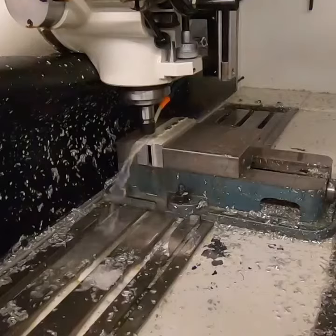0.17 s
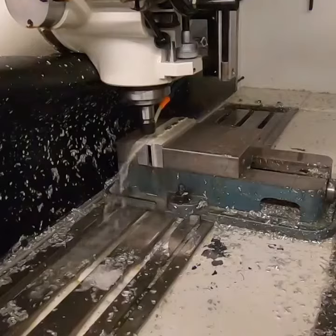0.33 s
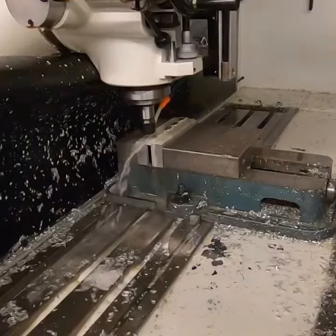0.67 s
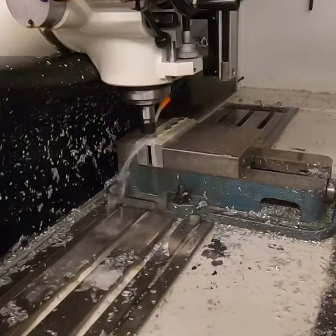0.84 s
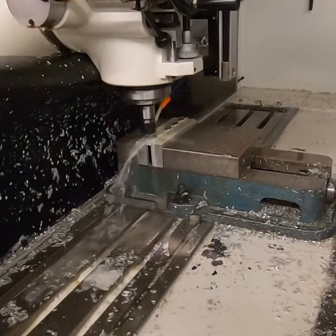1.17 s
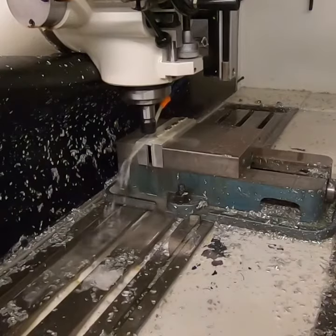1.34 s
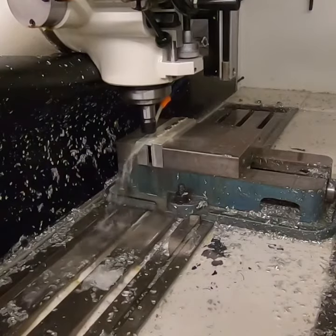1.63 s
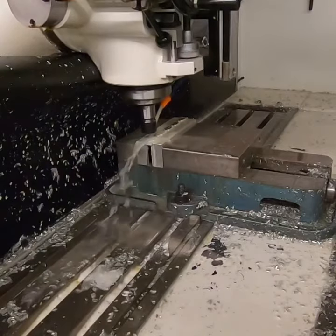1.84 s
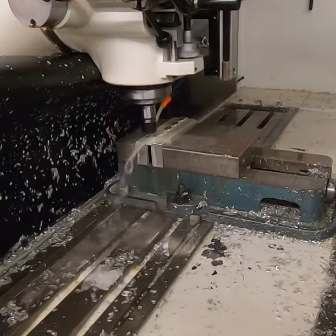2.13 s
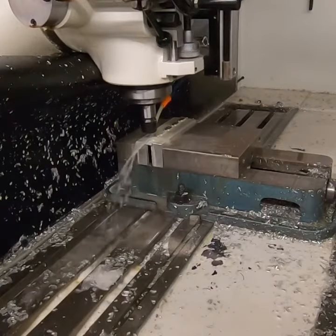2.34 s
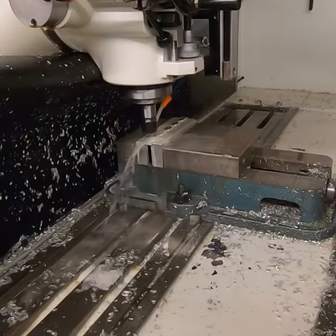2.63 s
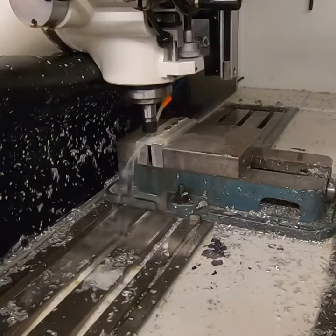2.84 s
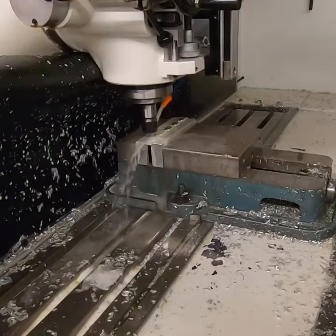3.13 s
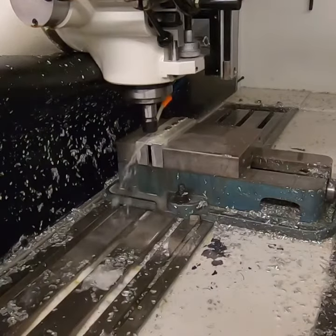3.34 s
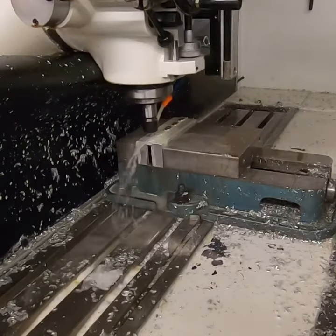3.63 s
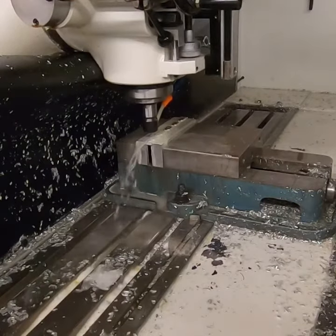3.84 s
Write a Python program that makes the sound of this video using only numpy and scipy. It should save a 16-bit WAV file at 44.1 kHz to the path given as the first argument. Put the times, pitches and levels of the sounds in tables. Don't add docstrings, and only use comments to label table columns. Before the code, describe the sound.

Continuous low drone of a milling machine in a workshop: uneven cabinet rumble and soft low thumps, singing spindle tones, a pump hum that swells and sags, and very faint hiss, all muffled, without a finish.

```python
import sys
import numpy as np
from scipy import signal
from scipy.fft import rfft, irfft
from scipy.io import wavfile
from scipy.ndimage import uniform_filter1d

SR = 44100
rng = np.random.default_rng(int(sys.argv[2]) if len(sys.argv) > 2 else 0)


def makeup_ratio(level_db):
    decades = np.asarray(level_db, float) / 20
    return 10 ** decades


def waveform_to_disk(signal):
    frames = np.transpose(np.atleast_2d(signal))
    scaled = np.clip(frames, -1, 1) * 32767
    samples = np.round(scaled).astype(np.int16)
    wavfile.write(sys.argv[1], SR, samples)


N = 176400

# (time [s], peak [dB], pitch [Hz])
CABINET_THUMPS = [(0.332, -22, 190), (0.379, -20, 197), (0.422, -21.5, 193), (0.502, -21, 196),
                  (0.53, -19.5, 203), (0.58, -24.5, 208), (0.623, -20.5, 186), (0.694, -24, 212),
                  (0.716, -25.5, 169.5), (0.837, -27, 202), (0.877, -23, 198), (0.929, -27, 179),
                  (1.003, -26.1, 194), (1.033, -31, 202), (1.082, -21, 201), (1.138, -23, 218),
                  (1.262, -33, 211), (1.324, -23.5, 212), (1.37, -25.5, 214), (1.403, -28, 225),
                  (1.453, -22, 214), (1.499, -24.5, 195), (1.531, -24, 184), (1.628, -28.5, 193),
                  (1.678, -28.5, 200), (1.771, -32.5, 206), (1.824, -23.5, 221), (1.852, -26.5, 193),
                  (2.01, -22.5, 216), (2.09, -23.5, 196), (2.15, -25.5, 198), (2.286, -24, 190),
                  (2.328, -27.8, 210), (2.357, -27, 205), (2.47, -28.5, 216), (2.553, -27, 204),
                  (2.598, -25.5, 209), (2.808, -22.5, 207), (2.839, -26, 223), (3.109, -28, 194),
                  (3.142, -25.5, 199), (3.228, -25, 182), (3.285, -23, 203.5), (3.315, -25, 197),
                  (3.349, -24, 219), (3.378, -21, 217), (3.422, -20.5, 239), (3.498, -22, 235),
                  (3.528, -18, 237), (3.61, -27.1, 208), (3.708, -29, 213), (3.741, -20.5, 215),
                  (3.8, -28, 210), (3.838, -26.5, 180), (3.879, -31, 174), (3.93, -20.5, 220)]


def evened(x):
    return x / np.sqrt(np.mean(x ** 2) + 1e-20)


def curve(points):
    return np.interp(np.arange(N) / SR, *np.transpose(points))


def drift(hz):
    t = np.arange(0, N / SR + 0.015, .01)
    f = np.geomspace(.15, max(hz, .3), 12)[:, None]
    waves = np.sin(2 * np.pi * (f * t + rng.random((12, 1)))) / np.sqrt(f)
    return np.interp(np.arange(N) / SR, t, evened(waves.sum(0)))


def machine_tones(hum):
    # (frequency
    # [Hz], level [dB])
    steady_tones = [(59.2, -52.8), (101.6, -51.0), (119.6, -43), (152.9, -51.5), (166.7, -51.3), (171.3, -48.4),
                    (176.0, -46.1), (200.2, -44.0), (204.2, -50.8), (216.0, -40.8), (233.7, -49.7), (237.9, -42.4),
                    (304.7, -49.1), (400.4, -45.6), (404.8, -60), (408.8, -58), (414.3, -59.3), (417.5, -63.0),
            (495.1, -63.0), (500.5, -58.3), (508.9, -59.8), (591.5, -60.1), (714.8, -58.8), (733.8, -55.4),
            (748.1, -59.7), (781.6, -56.8),
                    (830.2, -51.7), (889.9, -67.2), (906.4, -57.3), (1020.0, -65.6), (1030.6, -61.8),
            (1034.4, -66.8), (1038.8, -59.4), (1057.7, -57.8), (1072.1, -55.6), (1086.8, -63.0),
            (1106.8, -47.8), (1136.0, -61.9), (1237.1, -59.7),
                    (1298.7, -69.8), (1304.6, -67.6), (1316.9, -69.7), (1333.2, -71.4), (1383.5, -63.4),
                (1396.1, -61.6), (1406.6, -71.9), (1433.8, -72.3), (1452.5, -63.3), (1462.9, -59.9),
                (1481.6, -57.0), (1500.6, -68.8),
                    (1631.1, -68.4), (1660.2, -62.8), (1674.7, -66.2), (1704.0, -66.0), (1726.0, -63.0),
               (1745.0, -67.7), (1753.4, -47.7), (1763.9, -71.2), (1782.7, -69.1), (1820.2, -58.4),
               (1828.8, -70.5), (1839.1, -63.1), (1941.5, -63.5),
                    (2534.9, -80.8), (2543.6, -87.1), (2554.0, -87.4), (2675.3, -78.1), (2709.1, -85.4),
              (2767.2, -81.5), (2810.4, -85.6), (2825.6, -84.5), (2859.0, -84.7), (2882.1, -83.2),
              (2897.2, -87.5), (2949.0, -85.5), (3072.9, -86.4), (3607.5, -87.8)]
    drive_whine = [(7665.7, -98.8), (7799.1, -91.3), (7932.6, -103.4), (8066.0, -102.6), (8199.4, -98.0)]
    strays = [(33.2, -55), (66.8, -55), (625.5, -64), (660, -66), (936.7, -67), (1243.7, -67), (1857, -75),
              (1970.3, -76), (2196.4, -81), (2214.5, -74.5), (3183, -88), (3250, -89), (3998, -93),
              (4293, -95)]
    # (frequency [Hz], beat rate [1/s], depth [0-1], loudest at [s])
    beats = [(1106.8, -1.3, .45, 1.145), (400.4, .12, .55, .9), (733.8, -.34, .45, .65),
             (1237.1, .3, .9, 3.1), (200.2, .34, .4, .4), (2675.3, .25, .5, 1.6), (176, .3, .5, .5),
             (216, .62, .3, .4), (830.2, 4.2, .25, 2.103), (1941.5, -4.55, .45, 2.15),
             (2214.5, -1.47, .8, 2.288), (2534.9, .93, .7, 2.532)]
    # (frequency [Hz], offset at first [dB], settled at [s])
    late = [(176.0, 2, 1.2), (119.6, -16, .75), (237.9, -9, 1.1), (906.4, -10, .75), (1106.8, -4.5, 1.0),
            (1941.5, -4, 1.4), (2214.5, -5, 1.5), (400.4, 2.5, 1.6)]
    # (time [s], speed [ratio])
    speed = [(0, 1.00012), (1.7, 1.00012), (2.5, 1.0), (2.8, .99975), (4, .99985)]

    t, out = np.arange(N) / SR, np.zeros(N)
    turns = np.cumsum(curve(speed)) / SR
    wander = [drift(4.0) for _ in range(8)]
    rows = steady_tones + drive_whine + strays
    for k, (hz, db) in enumerate(rows):
        waver_db = (.7 if hz > 390 else 1.4) * (-1) ** (k // 8)
        level_db = db - 0.5 * (hz < 290) + 1.0 * (hz > 5000)
        size = np.sqrt(2) * makeup_ratio(level_db + waver_db * wander[k % 8])
        clock = turns if 600 < hz < 5000 else t
        phase = 2 * np.pi * (hz * clock + rng.random())
        wave = np.sin(phase)
        for beat_hz, rate, depth, loudest_s in beats:
            if abs(np.log(beat_hz / hz)) < .002:
                wave = wave + depth * np.sin(phase + 2 * np.pi * rate * (t - loudest_s))
                if abs(rate) < 1:
                    wave = evened(wave) / np.sqrt(2)
        for late_hz, offset_db, settled_s in late:
            if late_hz == hz:
                unsettled = np.clip((settled_s - t) / (settled_s - .45), 0, 1)
                wave = wave * makeup_ratio(offset_db * unsettled)
        out += size * wave * (hum if 140 < hz < 290 else 1)
    return out


def impeller():
    # (time [s], level [dB])
    vane = [(.3, -36), (.9, -35.5), (1.63, -35), (2.1, -41.5), (2.4, -48), (2.6, -38.5), (2.75, -50.5),
            (3.05, -33.5), (3.3, -30.5), (3.45, -40), (3.65, -33), (4, -41)]
    vane_hz = 295.75
    return np.sqrt(2) * makeup_ratio(curve(vane)) * np.sin(2 * np.pi * vane_hz * np.arange(N) / SR)


def cabinet_booms():
    # (time [s], peak [dB], pitch [Hz])
    surge = [
        (3.512, -24, 240),
        (3.545, -20.5, 264),
    ]
    rise_s, fall_s = 0.0062, 0.0083
    t, out = np.arange(4000) / SR, np.zeros(N + 4000)
    shape = (1 - np.exp(-(t / rise_s) ** 2)) * np.exp(-t / fall_s)
    shape = shape / shape.max()
    for s, db, hz in CABINET_THUMPS + surge:
        start = round(s * SR)
        out[start:start + 4000] += makeup_ratio(db - 1) * shape * np.sin(2 * np.pi * hz * t)
    return out[:N]


def cabinet_hum_gain():
    depth, damp_s = 0.41, 0.01
    t = np.arange(0, N / SR + .01, .002)
    dip = np.zeros(len(t))
    for s, db, hz in CABINET_THUMPS:
        dip += makeup_ratio(db + 24) * np.exp(-((t - s - .008) / damp_s) ** 2)
    return 1 - depth * np.interp(np.arange(N) / SR, t, np.minimum(dip, 1))


def casing(warm_db, hum):
    # (frequency [Hz], width [Hz], level [dB])
    resonances = [(99.6, 3.1, -61), (178.3, 13, -46), (211, 13, -45), (409.2, 11, -58.5),
                  (505.7, 16, -57.5), (540.3, 5.8, -65), (649, 19, -64.5), (719, 36, -59.5),
                  (1130, 120, -68), (1305, 53, -69.5), (1380, 15, -74.5), (1550, 240, -69.5),
                  (1420, 15, -80.5), (1722, 69, -67), (1783, 42, -68.5), (2534, 16, -81), (2683, 45, -77),
                  (2863, 18, -81), (2884, 110, -74.5)]
    hz = np.fft.rfftfreq(N, 1 / SR)
    white = rfft(rng.standard_normal(N))
    out = np.zeros(N)
    for f, width, db in resonances:
        ring = evened(irfft(white / (1 + 1j * (hz - f) / width) ** 2, N))
        if f > 2000:
            ring = ring * makeup_ratio(0.54 * warm_db)
        elif 150 < f < 300:
            ring = ring * hum
        out += makeup_ratio(db) * ring
    return out


def noise(colour, patchy_db, swell_db, size):
    hop = size // 4
    frames, hz = N // hop + 5, np.fft.rfftfreq(size, 1 / SR)
    a, b, patches = rng.standard_normal((frames, len(hz), 3)).T
    patches = uniform_filter1d(patches, size=6, axis=0)
    patches = evened(uniform_filter1d(patches, size=5, axis=1))
    f, level = np.transpose(colour)
    shape_db = np.interp(np.log(hz + 1), np.log(f + 1), level, left=-140, right=-160)
    z = (a + 1j * b) * makeup_ratio(shape_db[:, None] + patchy_db * patches) * np.sqrt(SR / size / 2)
    sound = signal.istft(z, nperseg=size, noverlap=size - hop)[1][:N]
    return sound * makeup_ratio(swell_db * drift(2.1))


def cabinet_rumble(hum):
    # (frequency [Hz], density [dB per Hz])
    colour = [(100, -79), (140, -55), (200, -61.5), (270, -60), (332, -58), (346, -88.5)]
    # (time [s], level [dB])
    shake = [(.3, 5.5), (.7, -1.5), (1.2, 2), (1.7, 2), (2.3, -1), (2.8, -0.5), (3.2, 0), (3.6, -1.5),
             (4, 0.5)]
    return hum * makeup_ratio(curve(shake)) * noise(colour, 1.5, 0.29, size=2048)


def bed_shudder():
    # (time [s], level [dB])
    bed = [(0.3, -53), (0.6, -43), (0.67, -46.5), (1.62, -44.5), (1.64, -55), (1.96, -45), (2.7, -45),
           (2.93, -40), (2.97, -49), (3.44, -41.5), (3.51, -45.5), (3.93, -45), (4.0, -52)]
    # (frequency [Hz], density [dB per Hz])
    colour = [(20, -30.5), (45, -18), (70, -18), (88, -27.5), (110, -20.5), (135, -32.5)]
    return makeup_ratio(curve(bed)) * noise(colour, 0.98, .2, size=2048)


def bearing_whirr():
    # (frequency [Hz], density [dB per Hz])
    colour = [(250, -94.5), (380, -71), (575, -78), (720, -70.5), (950, -78), (1250, -77), (1500, -84.5),
              (1600, -99)]
    return noise(colour, 1.0, 0.25, size=2048)


def spindle_sheen(warm_db):
    # (frequency [Hz], density [dB per Hz])
    colour = [(1560, -100), (1640, -78), (1750, -86), (1850, -82), (1900, -91), (2200, -89.5), (2280, -101),
              (2500, -112)]
    return makeup_ratio(1.7 * warm_db) * noise(colour, 1.0, 0.46, size=2048)


def coolant_hiss(warm_db):
    # (frequency [Hz], density [dB per Hz])
    colour = [(1800, -108), (2350, -100.5), (3400, -98.8), (4400, -104), (4900, -108), (6150, -109),
              (8800, -117.5), (9300, -135)]
    return makeup_ratio(0.23 * warm_db) * noise(colour, 1.2, 0.22, size=512)


def coolant_mist(warm_db):
    # (frequency [Hz], density [dB per Hz])
    colour = [(8600, -135), (9000, -119), (9720, -122), (10200, -125), (10800, -128), (11250, -146),
              (11450, -139), (12000, -141)]
    return makeup_ratio(2.0 * warm_db) * noise(colour, 3.7, 1.3, size=1024)


def scene():
    warm_db = -5 * np.exp(-np.arange(N) / SR / 0.83)
    hum = cabinet_hum_gain()
    mix = machine_tones(hum) + impeller() + cabinet_booms() + casing(warm_db, hum)
    mix += cabinet_rumble(hum) + bed_shudder() + bearing_whirr()
    mix += spindle_sheen(warm_db) + coolant_hiss(warm_db) + coolant_mist(warm_db)
    return mix[None]


def trimmed(x):
    # (time [s], frequency [Hz])
    upper_edge = [(0, 8700), (.5, 8850), (.8, 9150), (1.2, 9350), (1.5, 9600), (2.6, 9800), (3.1, 9850),
                  (4, 9600)]
    # (time [s], length [s], low [Hz], high [Hz])
    holes = [
        (.48, .06, 1990, 2090),
        (.54, .1, 2230, 2350),
        (.59, .05, 2330, 2450),
        (3.9, .04, 2000, 2420),
    ]
    step_hz, jump_hz = 230, 280
    hz, t, z = signal.stft(x, SR, nperseg=1024)
    jumps = np.repeat(rng.exponential(1, len(t)), repeats=2)[:len(t)] - 1
    edge = np.interp(t, *np.transpose(upper_edge)) + jump_hz * jumps
    edge = np.round(edge / step_hz) * step_hz
    keep = 1. - (hz[:, None] > edge) * (hz[:, None] < 11200)
    for s, length, low_hz, high_hz in holes:
        keep[np.ix_((hz >= low_hz) & (hz <= high_hz), (t >= s) & (t <= s + length))] = .03
    return signal.istft(z * keep, SR, nperseg=1024)[1][:, :N]


def band_limit(x):
    return signal.sosfilt(signal.butter(12, 12000, fs=SR, output="sos"), x)


def record(dry):
    # (time [s], gain [dB])
    fade = [(0, -120), (.245, -75), (.262, -58), (.276, -23.5), (.295, -12.5), (.32, -3.5), (.34, -0.5),
            (1.2, 0.83)]
    mix = trimmed(dry * makeup_ratio(curve(fade)))
    return band_limit(mix)


dry = scene()
out = record(dry)
waveform_to_disk(out)
```